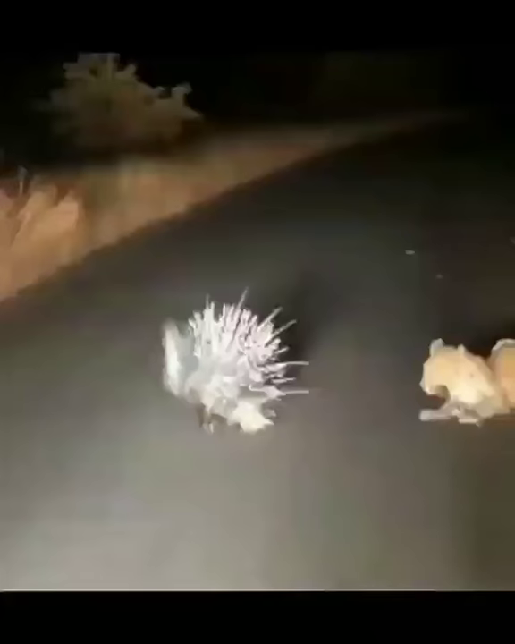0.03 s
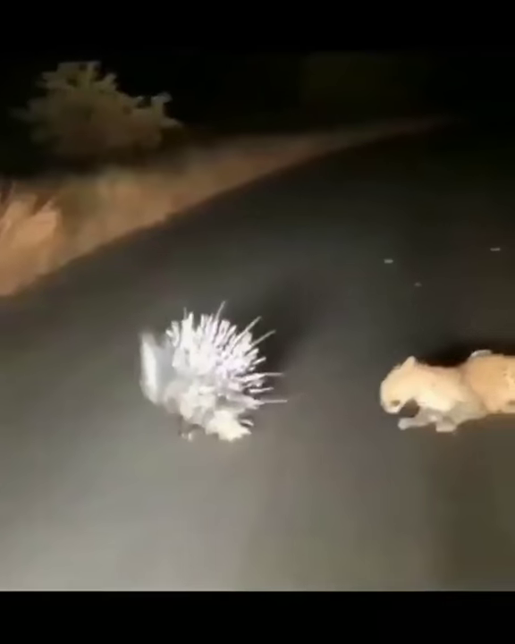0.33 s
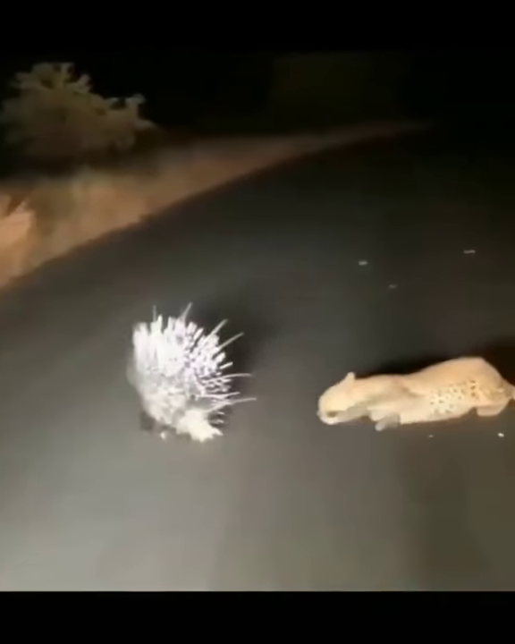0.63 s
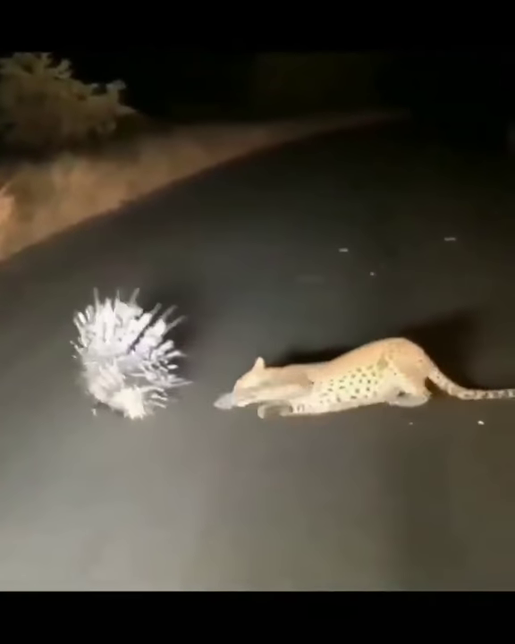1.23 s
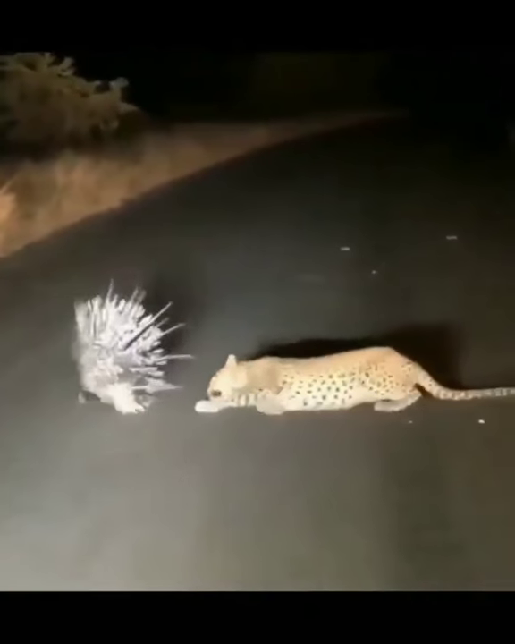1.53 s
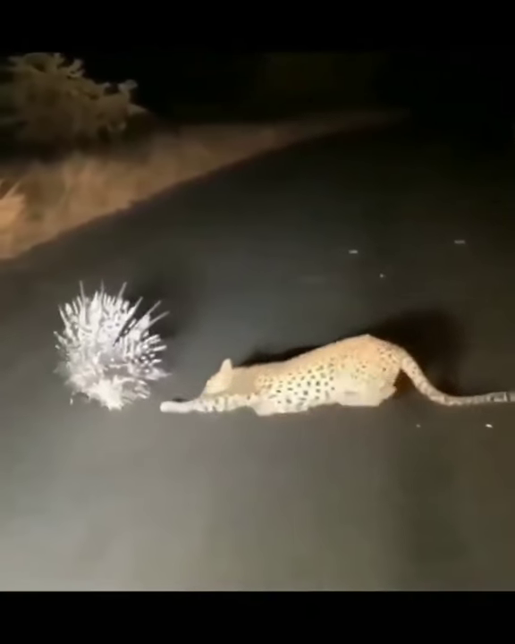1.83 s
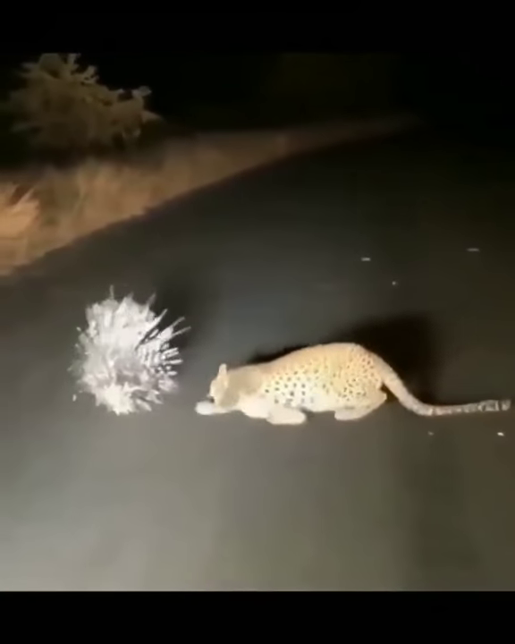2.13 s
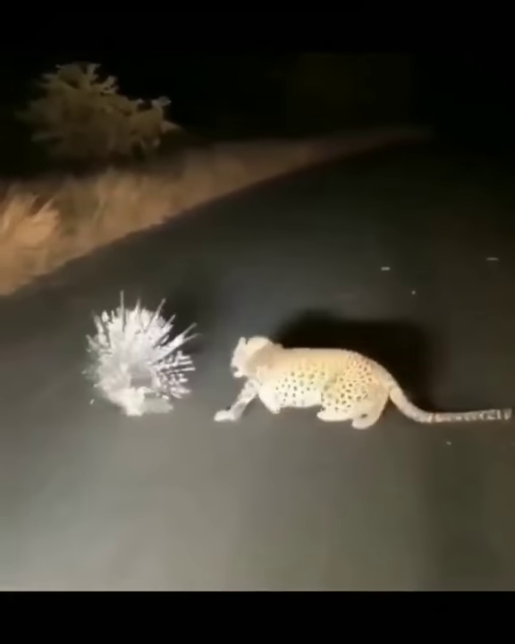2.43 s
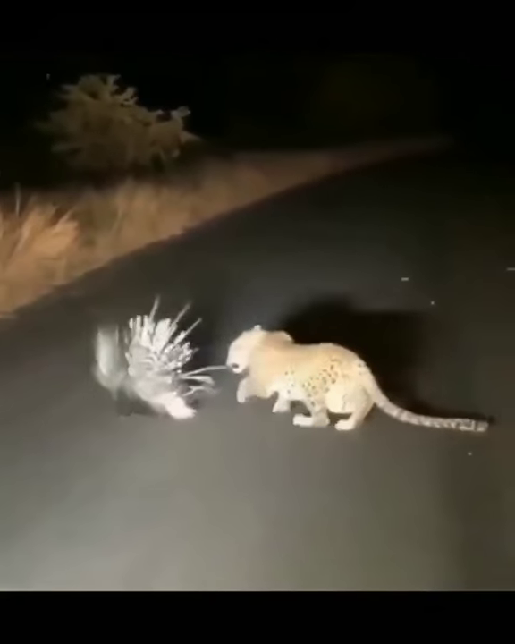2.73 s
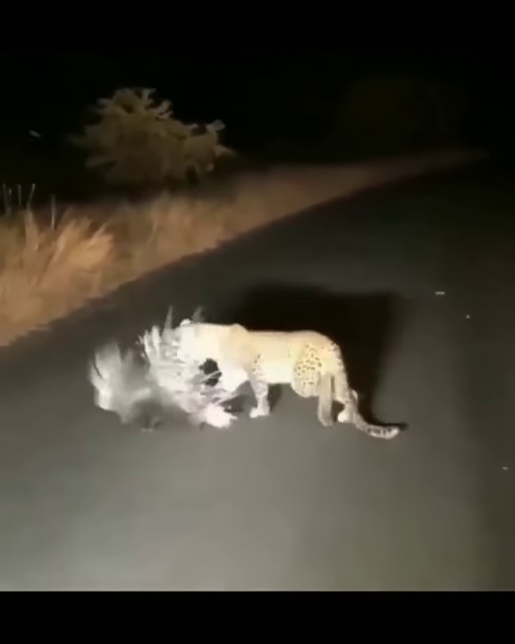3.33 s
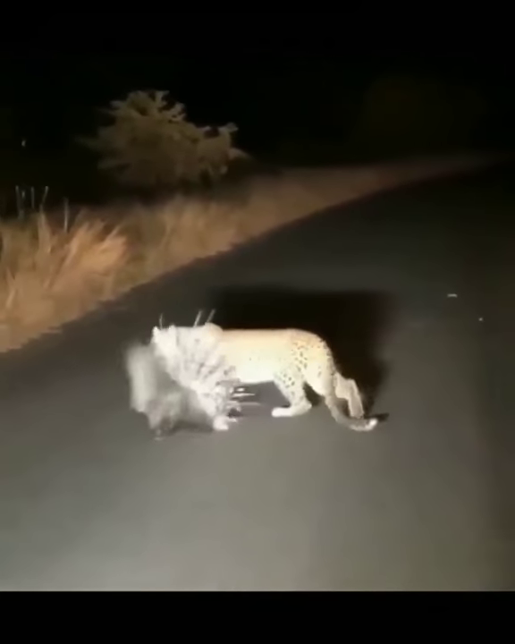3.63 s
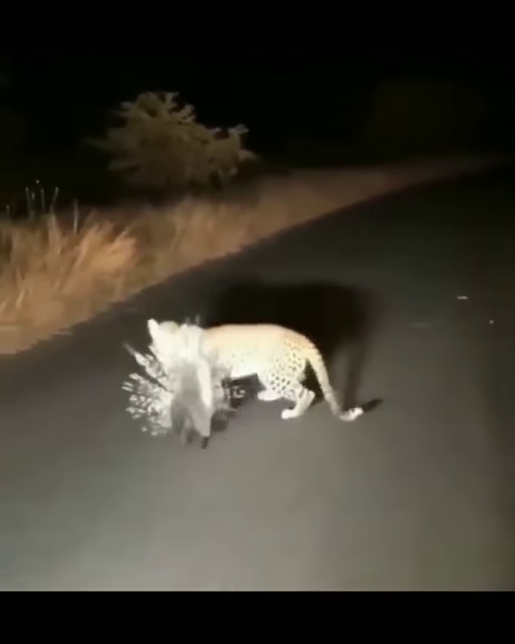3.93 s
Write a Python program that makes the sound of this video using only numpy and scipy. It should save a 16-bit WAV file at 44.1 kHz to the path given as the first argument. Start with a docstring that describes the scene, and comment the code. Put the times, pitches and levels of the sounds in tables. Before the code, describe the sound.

An idling engine, probably a diesel, rumbles, knocks and ticks evenly.

```python
"""An even exhaust drone with a loping clatter: a four-cylinder engine, probably a diesel, at 750 rpm,
heard from the standing vehicle on an open road. Each firing drones in the exhaust, thumps the body
and knocks in the block; valve gear ticks and rings between the knocks. The cylinders differ,
so the clatter lopes once a cycle, over a soft hiss of intake and fan."""
import sys
import numpy as np
from scipy import signal
from scipy.fft import rfft, irfft
from scipy.io import wavfile
from scipy.ndimage import uniform_filter1d

SR = 44100
rng = np.random.default_rng(int(sys.argv[2]) if len(sys.argv) > 2 else 0)


def unload_wav(signal):
    """Save mono or channel-first audio to the path in sys.argv[1] as 16-bit WAV at rate SR, clipped to [-1, 1]."""
    wavfile.write(
        sys.argv[1],
        SR,
        np.round(np.clip(np.atleast_2d(signal).T, -1, 1) * 32767).astype(np.int16),
    )


N = 176400

FIRING_HZ = 24.99
CYCLE_S = 4 / FIRING_HZ


def undb(db):
    """Decibels to gain."""
    return 10 ** (np.asarray(db) / 20)


def level(x, rms_db):
    """Set the rms level."""
    return x * undb(rms_db) / np.sqrt(np.mean(x ** 2))


def gains(spectrum, hz):
    """Read a spectrum on a log-frequency axis."""
    f, db = np.array(spectrum).T
    return undb(np.interp(np.log(np.maximum(hz, 1)), np.log(f), db))


def colour(x, spectrum):
    """Filter by a spectrum."""
    return irfft(rfft(x) * gains(spectrum, np.fft.rfftfreq(N, 1 / SR)), N)


def walk(rate_hz):
    """Smooth random drift, unit spread."""
    k = int(SR / rate_hz)
    steps = np.repeat(rng.standard_normal(N // k + 1), k)
    drift = uniform_filter1d(uniform_filter1d(steps, k), k)[:N]
    return drift / drift.std()


def per_cycle(cycle):
    """One random value per engine cycle, unit spread."""
    return rng.standard_normal(64)[cycle.astype(int)]


def strike(age, attack_s, decay_s):
    """Linear rise, exponential decay."""
    return np.minimum(age / attack_s, 1) * np.exp(-np.maximum(age - attack_s, 0) / decay_s)


def partial(t, hz, rms_db):
    """One engine tone; its level wavers more with pitch, up to 510 Hz."""
    waver_db = 1.9 * min(hz / 510, 1)
    return level(np.sin(2 * np.pi * (hz * t + rng.random())) * undb(waver_db * walk(25.11)), rms_db)


# Cylinders: firing t/s in the cycle, knock level/dB, thump level/dB, valve level/dB
CYLINDERS = [(0.014, -2, 1.5, 0.5), (0.056, -0.5, 0, 0.5), (.096, -3, 0.5, 1), (.136, -0.5, -3.5, 1)]
FIRING_S, KNOCK_DB, THUMP_DB, VALVE_DB = np.array(CYLINDERS).T


def firings(t, cylinder_db, attack_s, decay_s, lag_s=0, scatter_db=0):
    """Envelope of one blow per firing, summed in power."""
    power = 0
    for firing_s, db in zip(FIRING_S, cylinder_db):
        cycle, age = np.divmod(t - firing_s - lag_s, CYCLE_S)
        power += (strike(age, attack_s, decay_s) * undb(db + scatter_db * per_cycle(cycle))) ** 2
    return np.sqrt(power)


# Exhaust harmonics: multiple of the firing rate, relative level/dB
EXHAUST_ORDERS = [(1, -22), (2, -8), (3, 0), (4, -11), (5, -13), (6, -10), (7, -7.5), (8, -4), (9, -5),
                  (10, -8), (11, -12), (12, -14), (13, -13), (14, -13), (15, -17), (16, -21), (17, -19),
                  (18, -11), (19, -16), (20, -10), (21, -8), (22, -15), (23, -14), (24, -13), (25, -15)]


def exhaust_drone(t):
    """Exhaust pulses drone at harmonics of the firing rate."""
    return level(sum(partial(t, k * FIRING_HZ, db) for k, db in EXHAUST_ORDERS), rms_db=-45.4)


# Body thump spectrum: f/Hz, relative level/dB
THUMP_SPECTRUM = [(40, -42), (85, -4.5), (115, -14.5), (140, 3), (165, -14), (200, -3.5), (265, -12.5),
                  (300, -7.5), (350, -12), (420, -10), (480, -10), (535, -4.5), (580, -5.5), (690, -10),
                  (760, -11), (1100, -14.5), (1450, -20), (1600, -12.5), (1750, -35.5), (1900, -29),
                  (3000, -25.5), (5000, -52.5)]


def body_thumps(t):
    """Four firings thump the body in a pattern that repeats every cycle."""
    size = int(CYCLE_S * SR)
    cycle_t = np.arange(size) / SR
    noise = rng.standard_normal(size)
    burst = rfft(noise * firings(cycle_t, THUMP_DB, attack_s=0.003, decay_s=0.026, lag_s=0.0114))
    harmonic = np.arange(len(burst))
    between_orders = harmonic % len(CYLINDERS) > 0  # the drone supplies the firing orders
    pattern = irfft(burst / abs(burst) * gains(THUMP_SPECTRUM, harmonic / CYCLE_S) * between_orders, size)
    thumps = np.interp(t, cycle_t, pattern, period=CYCLE_S)
    waver_db = walk(22.08)
    return level(thumps, rms_db=-52) * undb(waver_db)


# Combustion rumble spectrum: f/Hz, relative level/dB
RUMBLE_SPECTRUM = [(15, -19), (40, -24), (75, -5), (120, -4.5), (210, -2.5), (270, -1), (320, -5.5),
                   (420, -3), (520, 1), (620, -6), (850, -7), (1300, -6.5), (2500, -42.5)]


def combustion_rumble(t):
    """Uneven combustion shakes the body differently at every firing."""
    push = firings(t, THUMP_DB, attack_s=0.004, decay_s=0.048, lag_s=0.0065, scatter_db=1.5)
    return level(colour(rng.standard_normal(N) * push, RUMBLE_SPECTRUM), rms_db=-52)


# Body modes: f/Hz, relative level/dB
BODY_MODES = [(136, 3), (195, 0), (262, -1), (330, -5.5), (520, -4)]


def heavy_beat(t, onset_s=0.031, scatter_db=1.4):
    """One cylinder fires harder than the rest and sets the body booming."""
    cycle, age = np.divmod(t - onset_s, CYCLE_S)
    envelope = undb(scatter_db * per_cycle(cycle)) * strike(age, attack_s=0.0072, decay_s=0.017)
    modes = sum(undb(db) * np.sin(2 * np.pi * hz * age) for hz, db in BODY_MODES)
    return level(envelope * modes, rms_db=-53.5)


# Panel and cover tones: f/Hz, rms level/dB
PANEL_TONES = [(231.2, -60.5), (243.7, -63), (268.7, -64), (531, -62), (543.7, -61.5), (874.6, -67.5),
               (899.6, -67.5), (924.6, -73.5), (1249.5, -67.5)]


def panel_hum(t, swell_share=0.31):
    """Panels hum at harmonics of the cycle rate and swell with each firing."""
    hum = sum(partial(t, round(hz * CYCLE_S) / CYCLE_S, db) for hz, db in PANEL_TONES)
    swell = level(firings(t, THUMP_DB, attack_s=0.021, decay_s=0.0096), 0)
    return hum * level(1 - swell_share + swell_share * swell, 0)


# Pipe and gear tones: f/Hz, rms level/dB, swells per cycle, crest t/s, depth/dB, bend/Hz
PIPE_AND_GEAR_TONES = [(687.3, -57.3, 2, .051, 5, 16), (824.7, -56.3, 4, .023, 4.5, 4),
                       (4364, -67, 4, .021, 5, 40)]


def pipes_and_gears(t, drift=0.003, waver_db=1.5):
    """Two pipe tones and a thin gear whine swell and rise as the crank surges within each cycle."""
    out = 0
    for hz, db, swells, crest_s, depth_db, bend_hz in PIPE_AND_GEAR_TONES:
        swell = np.cos(2 * np.pi * swells * (t - crest_s) / CYCLE_S)
        pitch_hz = hz * (1 + drift * walk(60)) + bend_hz * swell
        tone = np.sin(2 * np.pi * (np.cumsum(pitch_hz) / SR + rng.random()))
        out += level(tone * undb(depth_db * swell + waver_db * walk(25.01)), db)
    return out


# Block knock spectrum: f/Hz, relative level/dB
KNOCK_SPECTRUM = [(400, -7), (750, -4.5), (960, -8), (1060, 6.5), (1170, -6.5), (1270, -1), (1470, 4),
                  (1600, -11.5), (1750, 5), (1890, -39), (2000, -2.5), (2600, -18.5), (3500, -28.5),
                  (6000, -41.5)]


def block_knocks(t, repeat_share=0.53):
    """Each cylinder knocks in the block with a ring of its own that partly repeats every cycle."""
    cycle_t = np.arange(int(CYCLE_S * SR)) / SR
    repeating = level(np.interp(t, cycle_t, rng.standard_normal(len(cycle_t)), period=CYCLE_S), 0)
    grain = np.sqrt(repeat_share) * repeating + np.sqrt(1 - repeat_share) * rng.standard_normal(N)
    push = firings(t, KNOCK_DB, attack_s=0.0027, decay_s=0.017, scatter_db=0.4)
    return level(colour(grain * push, KNOCK_SPECTRUM), rms_db=-54.5)


# Harder firings: t/s, level/dB
HARD_KNOCKS = [(.223, -49.5), (.985, -49), (1.146, -51), (1.306, -48.5), (1.542, -51), (1.946, -46.5),
               (2.11, -53), (2.267, -52), (2.426, -51), (2.898, -49), (3.07, -50), (3.225, -52)]
# Block modes: f/Hz, relative level/dB
BLOCK_MODES = [(925, -7), (1055, -2), (1130, -12), (1250, -2.5), (1325, 5), (1425, -4.5), (1500, -4),
               (1710, 0.5)]


def hard_knocks(t, attack_s=0.0014, decay_s=0.0096, detune=0.01):
    """Now and then a firing strikes harder and the block rings briefly."""
    out = np.zeros(N)
    for onset_s, db in HARD_KNOCKS:
        active = (t > onset_s) & (t < onset_s + 10 * decay_s)
        age = t[active] - onset_s
        ring = 0
        for hz, mode_db in BLOCK_MODES:
            pitch_hz = hz * (1 + detune * rng.standard_normal())
            ring += undb(mode_db) * np.sin(2 * np.pi * (pitch_hz * age + rng.random()))
        out[active] += undb(db) * ring * np.minimum(age / attack_s, 1) * np.exp(-age / decay_s)
    return out


# Injector and valve tick spectrum: f/Hz, relative level/dB
TICK_SPECTRUM = [(900, -40), (1900, 7.5), (2150, -4.5), (2650, 7), (2820, 2.5), (3000, 2), (3250, 6.5),
                 (3600, 4), (4250, 4.5), (4800, -2), (7000, -8.5), (8000, -13.5), (10000, -26)]


def injector_and_valve_ticks(t):
    """An injector ticks at each firing, a softer valve after it."""
    injector = firings(t, VALVE_DB, attack_s=0.0062, decay_s=0.05, scatter_db=1.1)
    valve = firings(t, VALVE_DB - 7, attack_s=0.004, decay_s=0.024, lag_s=0.013, scatter_db=1.1)
    return level(colour(rng.standard_normal(N) * np.hypot(injector, valve), TICK_SPECTRUM), rms_db=-58)


# Small steel parts: f/Hz, width/Hz, relative level/dB
STEEL_MODES = [(4310, 25, 1), (4410, 110, -2), (3246, 50, -6), (3245, 49, 1.5), (3000, 45, 5),
               (2640, 54, -3), (2382, 40.9, 5), (2187, 25, -1), (2015, 16, 2)]


def steel_ringing(t):
    """Each firing sets small steel parts ringing; their pitch scatters a little."""
    taps = firings(t, VALVE_DB, attack_s=0.0047, decay_s=0.03, scatter_db=2)
    ring = 0
    for hz, width_hz, db in STEEL_MODES:
        pitch_hz = hz + width_hz / 2 * walk(100)
        ring += undb(db) * np.sin(2 * np.pi * np.cumsum(pitch_hz) / SR)
    return level(ring * taps, rms_db=-61)


# Swish spectrum: f/Hz, relative level/dB
SWISH_SPECTRUM = [(2500, -32), (4500, -1), (6400, 0), (7600, -10.5), (8200, -26), (10200, -34)]
# Swish accents: t/s, extra level/dB
SWISH_ACCENTS = [(.535, 3), (1.176, 4), (1.67, 4), (1.817, 4.5), (1.978, 5.5), (2.15, 3), (2.456, 8),
                 (2.771, 3), (2.946, 3), (3.097, 5), (3.423, 3), (3.586, 0), (3.908, 0)]


def belt_swish(t, crest_s=0.055, width_s=0.018, accent_width_s=0.017, scatter_db=1.7, grain_db=2.5):
    """A soft, grainy swish once a cycle, probably the belt; a few are louder."""
    cycle, age = np.divmod(t - crest_s + CYCLE_S / 2, CYCLE_S)
    accent_db = sum(db * np.exp(-((t - at_s) / accent_width_s) ** 2) for at_s, db in SWISH_ACCENTS)
    strength = undb(scatter_db * per_cycle(cycle) + accent_db)
    swell = np.exp(-((age - CYCLE_S / 2) / width_s) ** 2 / 2)
    grain = rng.standard_normal(N) * undb(grain_db * walk(400))
    return level(colour(grain, SWISH_SPECTRUM), -64.5) * strength * swell


# Body cavity spectrum: f/Hz, relative level/dB
CAVITY_SPECTRUM = [(110, -70), (182, -10), (203, 0), (225, -9), (450, -90)]


def body_cavity():
    """The body's hollow booms unevenly near 200 Hz, filling the gaps between beats."""
    return level(colour(rng.standard_normal(N), CAVITY_SPECTRUM), rms_db=-57)


# Intake and fan spectrum: f/Hz, relative level/dB
HISS_SPECTRUM = [(500, 7), (1500, 4.5), (2800, 7), (3700, -4.5), (4500, -1.5), (5300, -4), (6300, -3),
                 (7400, -6.5), (8100, -16), (9000, -23), (10200, -32)]


def intake_and_fan():
    """Air hisses steadily through intake and fan."""
    return level(colour(rng.standard_normal(N), HISS_SPECTRUM), rms_db=-55)


def scene(crank_drift_s=0.00009):
    """The idling engine in mono; all rhythmic parts follow the same crank."""
    t = np.arange(N) / SR + crank_drift_s * walk(5.936)
    hum = body_thumps(t) + exhaust_drone(t) + panel_hum(t)
    boom = heavy_beat(t) + combustion_rumble(t) + body_cavity()
    metal = block_knocks(t) + hard_knocks(t) + injector_and_valve_ticks(t) + steel_ringing(t)
    return (hum + boom + metal + pipes_and_gears(t) + belt_swish(t) + intake_and_fan())[None]


def record(dry):
    """The sound cuts in after a short silence; the top treble is cut off."""
    start_s, fade_s, cutoff_hz = 0.196, 0.018, 10200
    ramp = np.clip((np.arange(N) / SR - start_s) / fade_s, 0, 1)
    lowpass = signal.ellip(10, 0.2, 70, cutoff_hz, fs=SR, output="sos")
    return signal.sosfilt(lowpass, dry * np.sin(np.pi / 2 * ramp) ** 2)


dry = scene()
out = record(dry)
unload_wav(out)
```